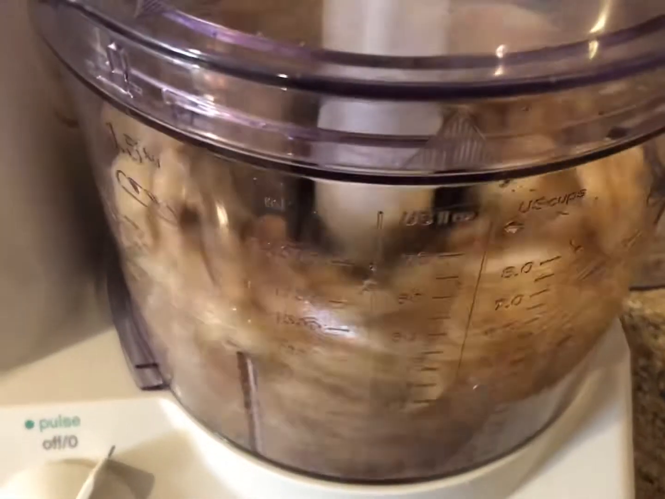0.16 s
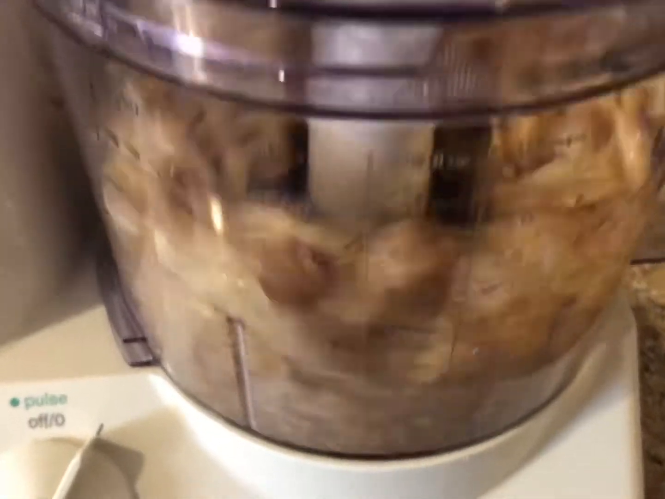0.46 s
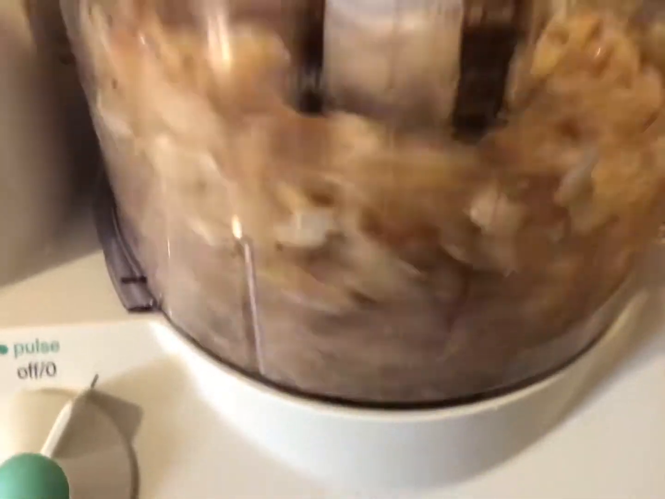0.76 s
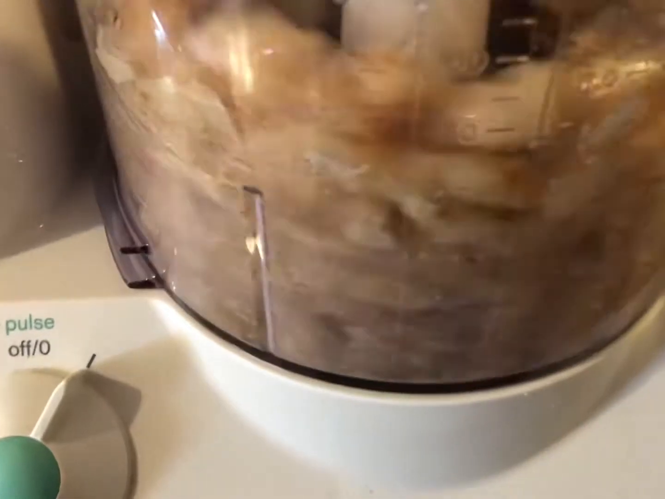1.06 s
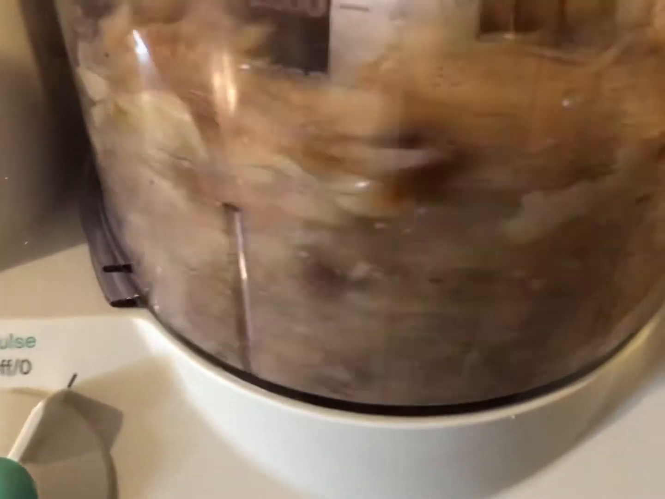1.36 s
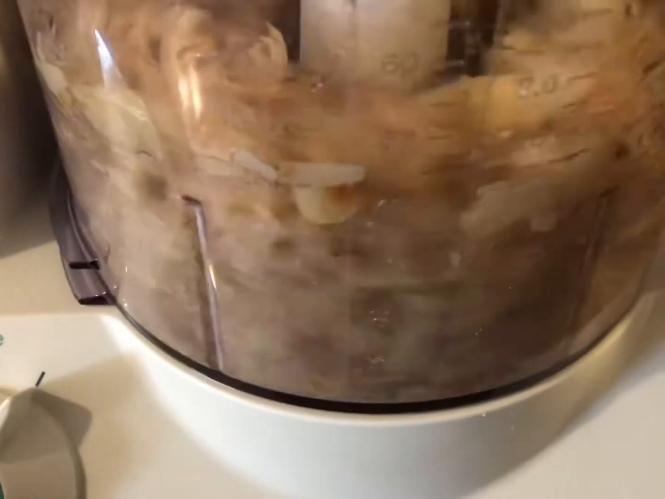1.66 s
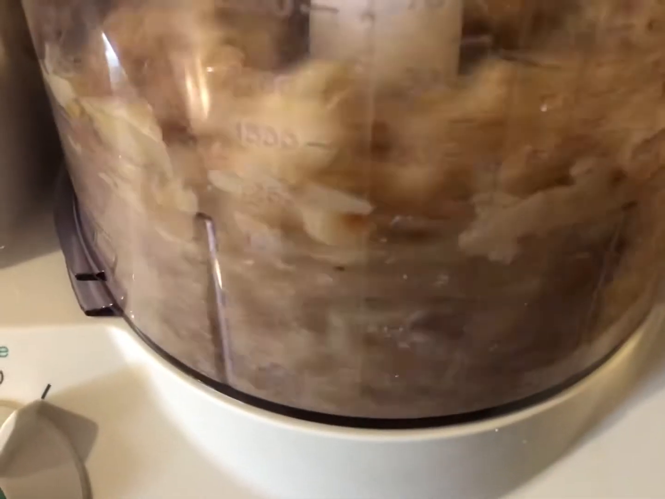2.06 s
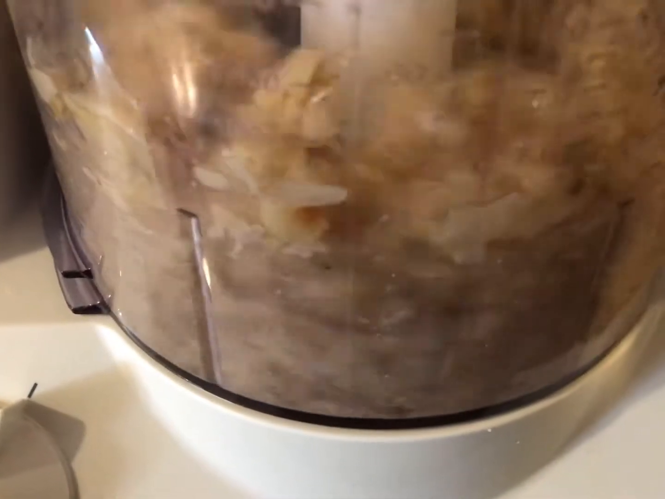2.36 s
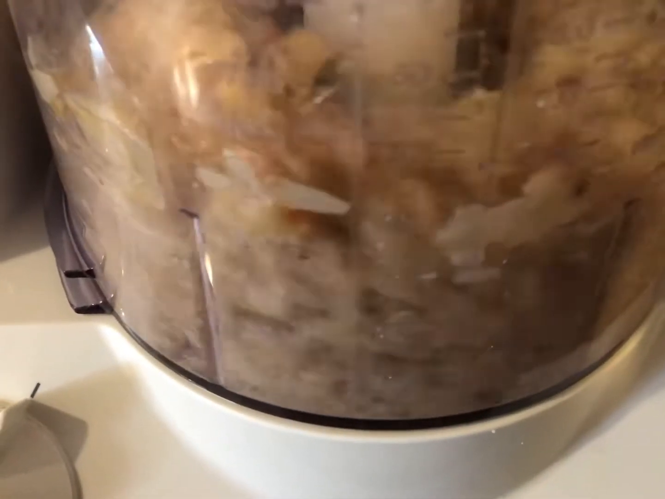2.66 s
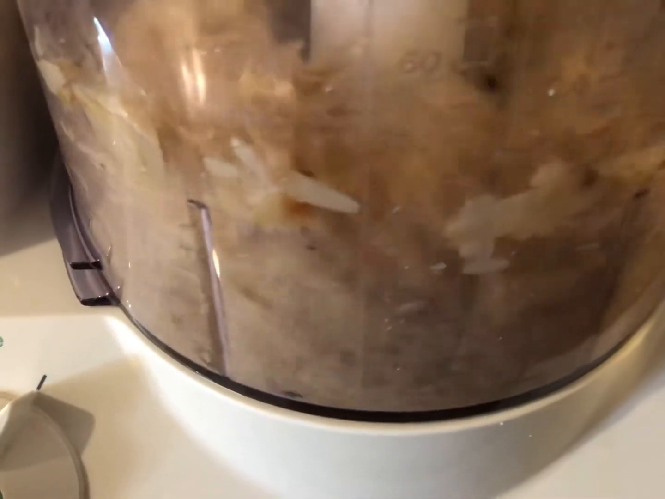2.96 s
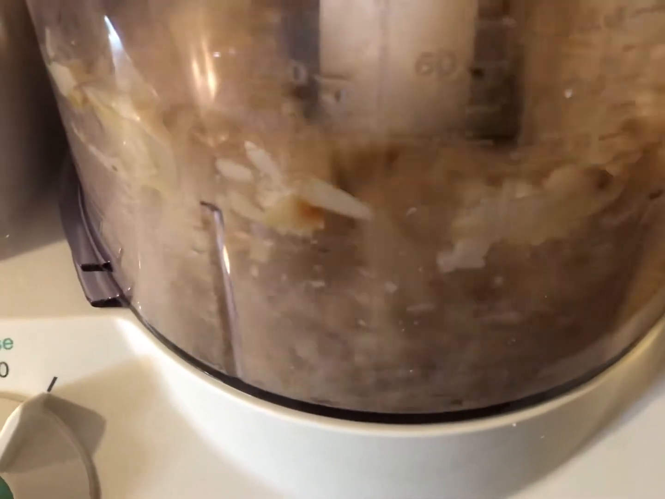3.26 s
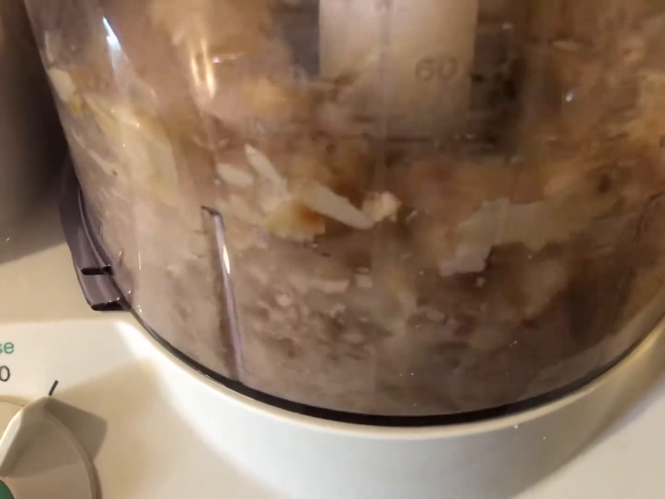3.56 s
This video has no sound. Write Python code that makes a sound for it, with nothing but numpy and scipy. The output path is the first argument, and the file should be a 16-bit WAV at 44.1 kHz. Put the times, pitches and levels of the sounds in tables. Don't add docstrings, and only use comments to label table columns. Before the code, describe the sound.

Close phone capture in a home kitchen: a food processor sings a piercing, wavering whine with airy hiss, while chunks clatter busily against plastic for the first second, then more sparsely over a mushy churn.

```python
import sys
import numpy as np
from scipy import signal
from scipy.io import wavfile
from scipy.ndimage import uniform_filter1d

SR = 44100
rng = np.random.default_rng(int(sys.argv[2]) if len(sys.argv) > 2 else 0)


def inscribe(sig):
    pcm = np.round(np.clip(np.atleast_2d(sig).T, -1, 1) * 32767)
    wavfile.write(sys.argv[1], SR, pcm.astype(np.int16))


def ratio_of_db(decibels):
    return 10 ** (np.asarray(decibels, float) / 20)


N = 163170
T = np.arange(N) / SR

# pitch_hz [Hz], width_hz [Hz], level_db [dB]
BOWL_TONES = [(122, 120, -6.5), (268, 161, 0.5), (642, 64, -5), (917, 221, -3.5), (1255, 253, -6.5),
              (1540, 146, -4), (1760, 135, 2.5), (2113, 67, -15), (2330, 340, -30), (3416, 314, -5),
              (4144, 180, -14)]
WALL_TONES_FROM_HZ = 550
BOWL_TOP_HZ = 4300
THUD_S = 0.0029


def level(x, db):
    return x * ratio_of_db(db) / np.sqrt(np.mean(x ** 2))


def band(x, hz, width_hz):
    return signal.lfilter(*signal.iirpeak(hz, hz / width_hz, fs=SR), x)


def twice(x, hz, width_hz):
    wide_hz = 1.5 * width_hz
    return band(band(x, hz, wide_hz), hz, wide_hz)


def dull_plastic(x):
    return signal.lfilter(*signal.butter(3, BOWL_TOP_HZ, fs=SR), x)


def bowl_wall(x):
    tones = [tone for tone in BOWL_TONES if tone[0] > WALL_TONES_FROM_HZ]
    rung = sum((-1) ** k * ratio_of_db(db) * band(x, hz, width_hz) for k, (hz, width_hz, db) in enumerate(tones))
    return dull_plastic(rung)


def walk(rate):
    hold = int(SR / rate)
    steps = rng.standard_normal(N // hold + 1)[np.arange(N) // hold]
    return 1.293 * uniform_filter1d(uniform_filter1d(steps, hold), hold)


def burst(times, sizes, decay_s):
    kick = np.zeros(N)
    np.add.at(kick, np.clip((times * SR).astype(int), 0, N - 1), sizes)
    softened = signal.lfilter([.08], [1, -.92], kick)
    fade = np.exp(-1 / (decay_s * SR))
    return signal.lfilter([1], [1, -fade], softened) * rng.standard_normal(N)


def motor(chop_db):
    # start_s [s], pitch_hz [Hz]
    gear_pitch = [(0, 3180), (.4, 3205), (.5, 3236), (.56, 3188), (.9, 3146), (1.03, 3172), (1.37, 3158),
                  (1.54, 3186), (1.76, 3205), (1.86, 3164), (2.24, 3172), (2.45, 3141), (2.6, 3179),
                  (2.79, 3168), (2.92, 3124), (3.08, 3144), (3.21, 3092), (3.7, 3130)]
    # times_shaft_speed [ratio], level_db [dB relative to the gear tone]
    shaft_tones = [
        (14, -34),
        (15, -22.5),
        (19, -21.5),
        (32, -27.5),
        (36, -57),
    ]
    teeth, shaft_turns_per_blade_turn = 16, 7.5
    mesh_hz = np.interp(T, *np.array(gear_pitch).T) + 15 * walk(45)
    shaft = 2 * np.pi * np.cumsum(mesh_hz) / SR / teeth
    blade = shaft / shaft_turns_per_blade_turn

    shake = signal.lfilter(*signal.butter(3, 140, fs=SR), rng.standard_normal((2, N)))
    shake = level(shake * ratio_of_db(0.84 * chop_db), -3)
    shake = shake * (1 + 0.12 * np.cos(2 * blade))
    level_shake, timing_shake = shake

    flutter_db = 0.9 * ratio_of_db(2 * (chop_db - np.mean(chop_db))) * walk(50)
    tone = (ratio_of_db(flutter_db) + 0.5 * level_shake) * np.sin(teeth * shaft + timing_shake)
    side = sum(ratio_of_db(db + 2.5 * walk(18)) * np.sin(k * shaft + .5 * walk(30.26)) for k, db in shaft_tones)
    whine = level(tone + side, -15.5) * ratio_of_db(0.5 * T)
    return whine, blade


def hiss():
    housing_hz = [5000, 5850, 6200, 6520, 7700, 9750, 11200, 12400, 13450, 14300, 15150, 15680]
    # width_hz [Hz], level_db [dB], drift_db [dB per second]
    housing_tones = [(700, -14, -2.5), (120, -9, 1.5), (420, 0, 0.7), (180, -5.5, 0.5), (770, -9, 0),
                     (1340, -0.5, -1.3), (1111.1, -3, -5), (500, 0, 0.46), (450, -2, 0.5), (900, -9, -4),
                     (600, -4, 1.1), (250, -1, -1.2)]
    air = np.zeros(N)
    for hz, (width_hz, db, drift_db) in zip(housing_hz, housing_tones):
        gain = ratio_of_db(db + drift_db * T + 0.67 * walk(10))
        air += gain * twice(rng.standard_normal(N), hz, width_hz)
    return level(air, -29)


def churn(blade, chop_db):
    swell = 1 + 0.15 * np.cos(2 * blade) + 0.14 * np.cos(blade)
    softening_db = chop_db - chop_db[0]
    rub = np.zeros(N)
    for hz, width_hz, db in BOWL_TONES:
        follow = 1.1 if hz < 180 else 1
        gain = ratio_of_db(db + 0.99 * walk(7.9) + follow * softening_db)
        rub += gain * band(rng.standard_normal(N), hz, width_hz)
    return level(dull_plastic(rub * swell), -15.5)


def chunks(blade, chop_db):
    count, tries_per_s = 4000, 480
    crack_s = .0012
    when, size, hue, luck, heavy = rng.random((count, 5)).T
    times = when * N / SR
    at = (when * N).astype(int)
    chance = (1 + 0.26 * np.cos(2 * blade[at]) + .3 * np.cos(blade[at])) / 2
    lands = (luck < chance) & (np.arange(count) < tries_per_s * N / SR)
    size_db = np.minimum(-4.5 * np.log(size), 12)
    sizes = lands * ratio_of_db(size_db + 1.55 * chop_db[at])

    crack_hz = 4000 * 2 ** np.arange(0, 1.7, .33)
    pick = (hue * len(crack_hz)).astype(int)
    cracks = sum(band(burst(times, sizes * (pick == k), crack_s), hz, 0.39 * hz)
                 for k, hz in enumerate(crack_hz))
    thuds = bowl_wall(burst(times, sizes * heavy, THUD_S))
    return level(cracks, np.mean(chop_db) + 5.5) + level(thuds, -22.5)


def hits():
    # start_s [s], level_db [peak dB], pitch_hz [Hz of the crack],
    # thud_db [dB against the crack]
    blows = [(0.0348, -5, 10200, -2.5), (0.085, -9, 9700, -13), (0.1183, -10.5, 11000, -5),
             (0.1447, -9, 10400, -1), (0.177, -8.5, 9420, 2.5), (0.202, -18, 10200, 1),
             (0.2329, -8.5, 10700, -4), (0.2545, -6, 10200, -2), (0.3012, -8, 9290, -3),
             (0.3305, -9.5, 10100, -1), (0.3471, -8.5, 10400, -1), (0.3793, -7.5, 9360, -8),
             (0.4011, -12, 9210, -1), (0.4542, -18.5, 10600, 12), (0.4724, -3, 11100, -8),
             (0.5203, -9, 10000, -18), (0.5622, -9, 13300, 4), (0.5932, -9.5, 11500, 0.5),
             (0.62, -10, 9450, -6), (0.6382, -9.5, 13400, 1), (0.6577, -13, 6610, -10),
             (0.6848, -17, 6580, -7), (0.7073, -10.5, 7950, 0), (0.726, -7, 9300, -24),
             (0.755, -4.5, 7650, -1), (0.7722, -7.5, 6500, -2), (0.8264, -11, 9300, -4),
             (0.9028, -14, 9650, 7.5),
             (1.0275, -15, 12800, -8), (1.0546, -5.5, 10200, -5), (1.0808, -11, 10100, 3),
                 (1.1096, -10, 7800, 0.5), (1.1954, -7.5, 10800, 1), (1.2806, -16, 10400, 2),
                 (1.3635, -10, 13300, 3), (1.4728, -13, 12400, 0), (1.505, -8.5, 9440, -4),
                 (1.5247, -12, 13400, 2), (1.5903, -14.5, 6530, 2), (1.8539, -15.5, 12800, 5.5),
                 (1.9649, -11, 9460, 2), (1.9971, -18, 12700, 6.5), (2.1088, -13, 10000, -13),
                 (2.2022, -14, 12400, 3.5), (2.2869, -22, 12400, 3), (2.3059, -9, 12400, -14),
                 (2.4206, -20, 12400, 4), (2.4877, -7.5, 7020, -10), (2.5192, -16, 7660, -2),
                 (2.5623, -18, 13400, -7), (2.8663, -13, 8240, 2), (2.9185, -13.5, 12400, 1),
                 (3.2587, -19.5, 10100, 10.5), (3.3013, -12, 12400, 1), (3.4465, -14, 12400, -1),
                 (3.5306, -11, 7550, -4), (3.6242, -12.5, 10100, 1), (3.6694, -15.5, 12400, 3.5)]
    out = np.zeros(N)
    length = 1400
    age_s = np.arange(length) / SR
    rise = 1 - np.exp(-age_s / 0.0012)
    for start_s, db, hz, thud_db in blows:
        noise = rng.standard_normal((2, length))
        crack = band(noise[0] * rise * np.exp(-age_s / .0019), np.clip(0.91 * hz, 3000, 14000), 7600)
        thud = bowl_wall(noise[1] * rise * np.exp(-age_s / THUD_S))
        crack = crack / np.abs(crack).max()
        thud = ratio_of_db(thud_db + 8.5) * thud / np.abs(thud).max()
        one = ratio_of_db(db) * (crack + thud)
        i = int(start_s * SR)
        out[i:i + length] += one[:N - i]
    return out


def lumps():
    # start_s [s], level_db [peak dB]
    knocks = [
        (0.098, -20),
        (0.279, -27),
        (0.332, -11),
        (0.78, -13.5),
        (1.199, -17),
        (3.599, -27),
    ]
    start_s, peak_db = np.array(knocks).T[:, :, None]
    age = np.clip(T - start_s, 0, None) / 0.013
    push = np.sum(ratio_of_db(peak_db) * age * np.exp(1 - age), axis=0)
    return push * level(band(rng.standard_normal(N), 122.3, 220), -3.5)


def kitchen(clatter):
    lag_s = np.arange(12000) / SR
    fade = 1000. ** (-lag_s / 0.22)
    tail = rng.standard_normal(12000) * fade * (lag_s > .004)
    tail = tail / np.sqrt(np.sum(tail ** 2)) * ratio_of_db(-14.5)
    return signal.fftconvolve(clatter, tail)[:N]


def scene():
    # start_s [s], level_db [dB]
    chop = [
        (0, -36.5),
        (.75, -36),
        (1.0, -36),
        (1.5, -37),
        (1.9, -38.5),
        (2.8, -38.5),
        (3.7, -38.5),
    ]
    chop_db = np.interp(T, *np.array(chop).T)
    whine, blade = motor(chop_db)
    clatter = hiss() + churn(blade, chop_db) + chunks(blade, chop_db) + hits() + lumps()
    return (whine + clatter + kitchen(clatter))[None]


def band_limit(x):
    return signal.sosfilt(signal.butter(12, 15920, fs=SR, output="sos"), x)


def record(dry):
    low_cut_hz, top_hz, drive = 55, 15770, 1.15
    x = signal.sosfilt(signal.butter(4, low_cut_hz, "high", fs=SR, output="sos"), dry)
    x = np.tanh(drive * x) / drive
    x = signal.sosfilt(signal.ellip(14, .3, 70, top_hz, fs=SR, output="sos"), x)
    return band_limit(x)


dry = scene()
out = record(dry)
inscribe(out)
```